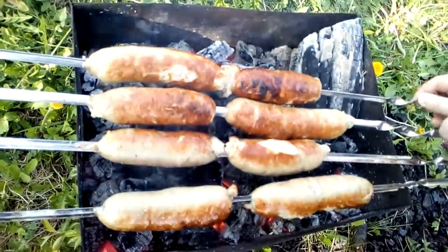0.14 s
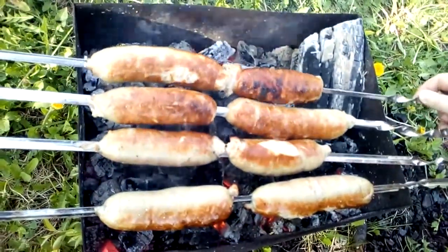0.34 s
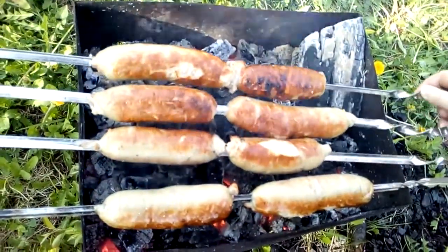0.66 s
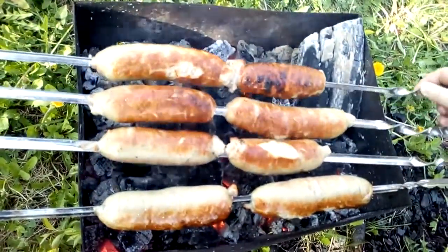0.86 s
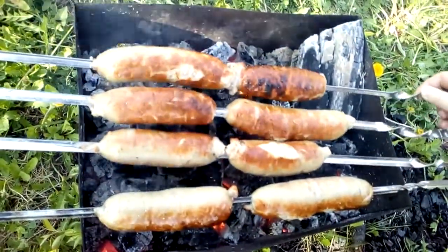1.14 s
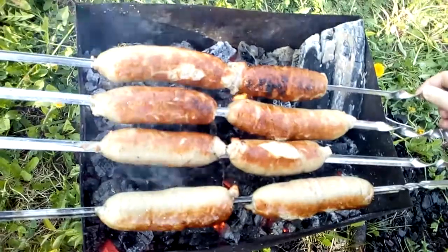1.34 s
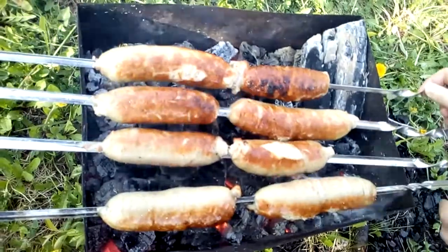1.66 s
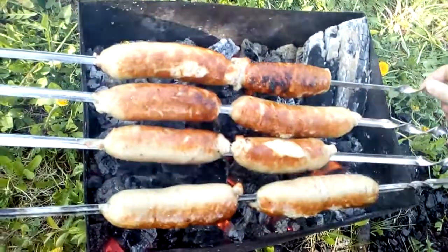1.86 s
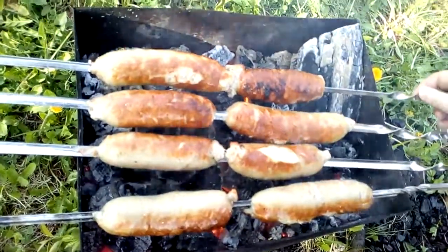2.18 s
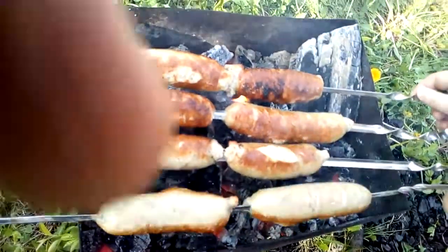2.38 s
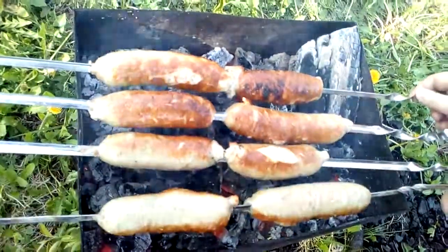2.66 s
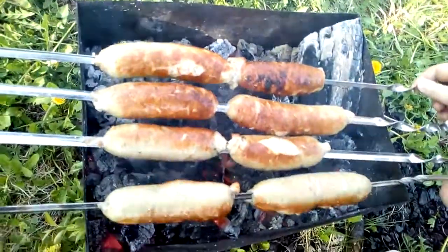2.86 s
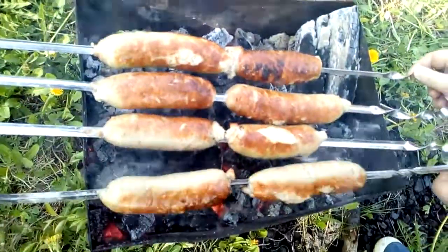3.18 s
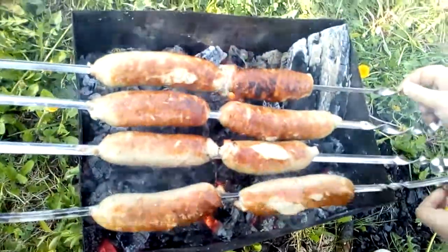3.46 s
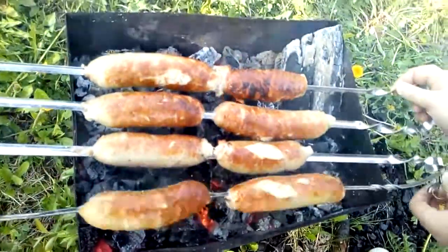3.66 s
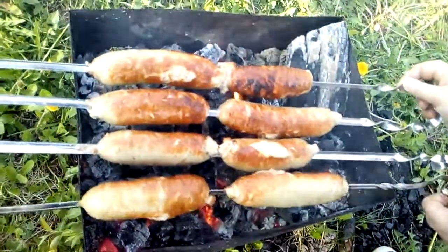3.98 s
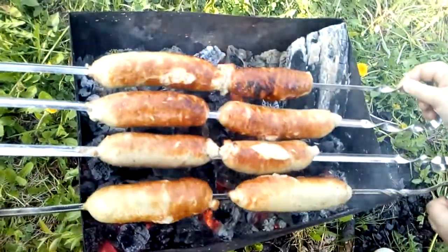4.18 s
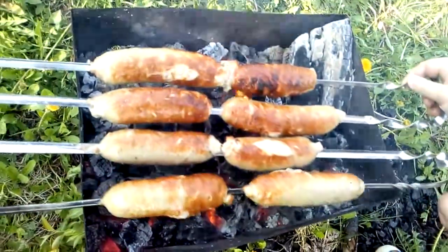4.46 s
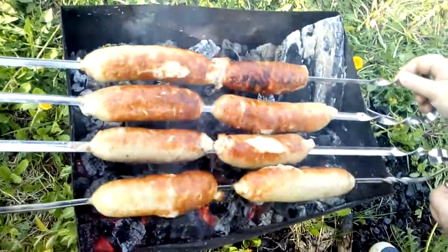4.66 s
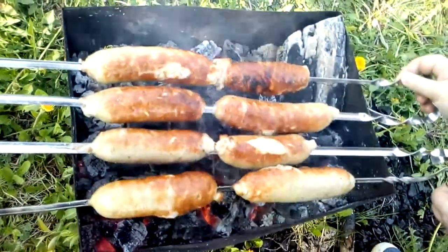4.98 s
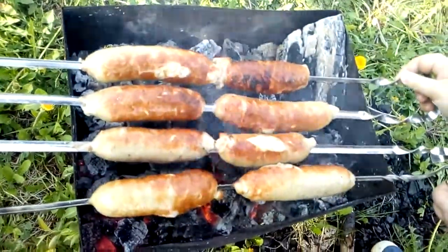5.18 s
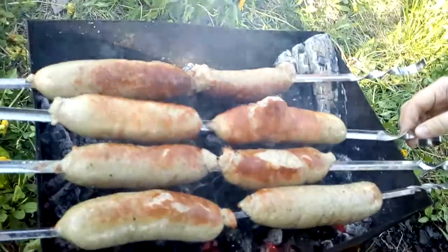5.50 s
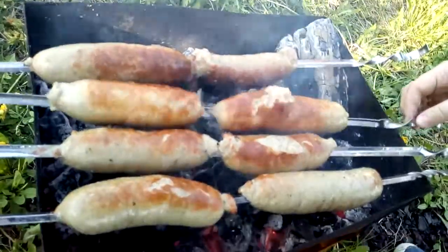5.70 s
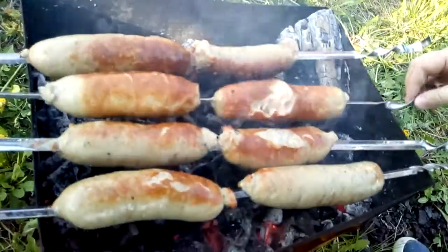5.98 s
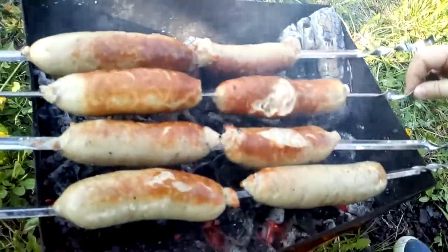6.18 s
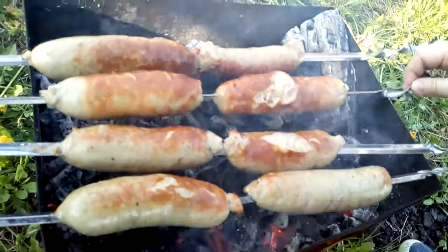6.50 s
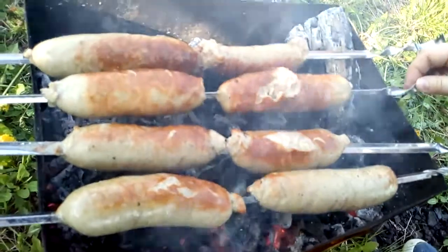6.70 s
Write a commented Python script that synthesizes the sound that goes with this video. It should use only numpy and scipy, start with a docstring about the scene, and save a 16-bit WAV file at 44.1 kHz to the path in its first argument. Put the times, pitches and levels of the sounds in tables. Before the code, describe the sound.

Close outdoor phone pickup of sausages sizzling over charcoal. A thin hiss and dense fine crackle run over tiny fat bubbles and faint low coal flutter. Sharp random pops with small airy thumps grow crowded after three seconds. Just before 5.3 seconds the sound cuts off abruptly, then sizzling fades back gradually, with pops still rising in level to the end.

```python
"""Steam pockets burst in the fat of sausages sizzling over a charcoal pan outdoors, close to a phone.
Each burst is shaped noise with a short ring and a slow push of air: crack, spatter and thump.
Fizz is many small bursts over a hiss, jets are banded noise that swells and dies away, the simmer is
a mass of decaying sine bubbles, and the coals are wavering half-octaves of noise.
The sound is cut once and then fades back in."""
import sys
import numpy as np
from scipy import signal
from scipy.fft import rfft, irfft
from scipy.io import wavfile
from scipy.ndimage import uniform_filter1d

SR = 44100
rng = np.random.default_rng(int(sys.argv[2]) if len(sys.argv) > 2 else 0)


def output_pcm(signal):
    """Save a mono or channel-first signal as 16-bit PCM at the path in sys.argv[1].

    Samples are clipped to [-1, 1] before scaling.
    """
    pcm = np.clip(np.atleast_2d(signal).T, -1, 1) * 32767
    wavfile.write(sys.argv[1], SR, np.round(pcm).astype(np.int16))


N = 301644  # length in samples

# Decay times of crack, spatter, ring and the leak ahead of the crack; median cycle of the thump
CRACK_S, SPATTER_S, RING_S, LEAK_S, THUMP_S = 0.00059, 0.0067, 0.0011, 0.005, 0.0014
LEAK_DB = -6.5  # leak beside the spatter
RING = 0.6  # ring beside the crack, before banding
SURGE, SURGE_SLOWER = 0.51, 2.89  # backwash of air: size and length beside the push
TREBLE_LEFT_HZ = 8500  # a band from here up leans 2 dB to the left; the lean grows with pitch squared
TICKS_A_SECOND, BUBBLES_A_SECOND = 100, 2000
SWELL_S, SETTLE_S = 0.013, 0.0091  # ramps of a boiling spell
COALS_DB, RIGHT_DB = -44.5, 2.5  # coal level before colouring; right channel above left
CUT_S, CUT_DB_PER_S, SILENCE_DB = 5.288, 2799, -66
RETURN_S, FADE_IN_S = 5.352, 2.2  # the fade is still rising at the end
TOP_HZ = 16700


def loud_bursts():
    """Large steam pockets burst one by one, each with its own balance of crack and thump."""
    # Each row: start in seconds, treble crack level in dB before band trims, middle crack in dB
    # relative to the treble level, thump in dB relative to the treble level.
    pops = [(0.0778, -22, -3, 0.5), (0.17, -10, -8.5, -4.5), (0.238, -26, 5.5, -3), (0.33, -19.5, -10, -3),
            (0.4372, -32, 5, -13), (0.47, -17, -26, -16), (0.4846, -30.5, -19, 13), (0.667, -18.5, -13, -3),
            (0.736, -17.5, -7.5, -6.5), (0.9311, -12.5, 0, -6.5), (1.178, -29, 2.5, -18),
            (1.375, -16.5, -4, 3.5), (1.385, -12, 4, -6.5), (1.448, -32.5, 11.5, 16.5),
            (1.461, -24, 3.5, 11.5), (1.413, -31, -4, -17), (1.4967, -28, 1.5, 5.5),
            (1.5827, -14, -8.5, -13.5), (1.7338, -20.5, -1, 0.5), (1.8376, -25.5, 2.5, 3.5),
            (1.909, -1, -11.5, -20.5), (1.9574, -14, -7, -7.5), (2.029, -16.5, -1.5, -21),
            (2.058, -19.5, -21, -27), (2.0777, -27, 5.5, -28), (2.145, -27.5, 2.5, 1),
            (2.2639, -5.5, -2, -18), (2.4125, -27.5, 5.5, 6.5), (2.555, -24.5, -2, -26),
            (2.5666, -29.5, 9.5, 6.5), (2.5864, -21, -22, -32), (2.6, -14.5, -7, -36),
            (2.665, -16.5, -3, -7.5), (2.7114, -27.5, 4.5, -14), (2.8708, -15, -2.5, -9),
            (2.9747, -16.5, -7.5, -5), (3.0109, -18.5, -9, -11), (3.0565, -21.5, -1.5, 2.5),
            (3.357, -7, -10.5, -16), (3.404, -16.5, -15, -32), (3.466, -35.5, 9, -5),
            (3.508, -19.5, -6.5, -35), (3.5641, -26.5, 1, 4), (3.6081, -7.5, -1, -16.5),
            (3.6857, -19, -2, -5.5), (3.837, -23.5, 2, 0), (3.904, -3, -5, -14.5), (3.936, -18.5, -3, 0),
            (4.0144, -11.5, 3, -4), (4.046, -17.5, -0.5, -22), (4.0778, -22, 1.5, 1.5),
            (4.0886, -15.5, -11, -14), (4.1433, -28, 13, 1), (4.187, -49, 22, 22), (4.2462, -11, -10, -15),
            (4.266, -19.5, -3, -13), (4.34, -33.5, 8, -16), (4.4235, -9, -7.5, -19), (4.466, -20.5, 1, -30),
            (4.495, -21.5, -5, -13), (4.56, -11.5, 6.5, -5.5), (4.734, -18, -13, -15),
            (4.736, -23, -12, -15), (4.7555, -12, -29, -39), (4.8, -10, -8, -13), (4.8244, -12, -12, -10),
            (4.8355, -17.5, -1.5, -6.5), (4.853, -21, 5.5, -8), (4.872, -18, -5, -9),
            (4.9278, -23.5, -7, -16), (4.9617, -12.5, -4.5, -10), (4.9778, -6, -5.5, -29),
            (5.0667, -14.5, -3.5, -5), (5.1029, -18, -7, 0.5), (5.1606, -1.5, -7.5, -11.5),
            (5.192, -21, 0, -3), (5.259, -4, -10.5, -16), (5.381, -34.5, 3, 8.5), (5.399, -25, -1, 0.5),
            (5.417, -32.5, 1, -5.5), (5.4877, -17, -7, -36), (5.51, -33, -1, -19), (5.658, -26.5, 1, -17),
            (5.773, -39, 10, -15), (5.805, -23.5, 2.5, -17), (5.924, -30.5, 14.5, 8),
            (5.9787, -33.5, 16, 10), (6.0631, -11, 7.5, -1), (6.3055, -7, -3.5, -9),
            (6.4504, -12, -5, -10.5), (6.6195, -21.5, -6, 3), (6.6612, -14.5, -4, -7.5)]
    s, treble_db, middle_db, thump_db = np.transpose(pops)
    spatter_db = -13.5 - 0.1 * treble_db  # strong bursts spatter less beside their crack
    return bursts(s, treble_db, middle_db, thump_db, spatter_db, 0.53, size=1300)


def bursts(s, treble_db, middle_db, thump_db, spatter_db, scatter_db, size):
    """Each pocket leaks steam, cracks open, shoves the air out and back, and throws uneven spatter."""
    t = (np.arange(size) - size // 4) / SR  # zero is the crack
    s = np.maximum(s + t[0], 0)
    after = np.maximum(t, 0)

    droplet_db = 2.95 * rng.standard_normal((len(s), size // 32 + 1))
    droplets = undb(np.repeat(droplet_db, 32, axis=1)[:, :size])
    leak = undb(LEAK_DB) * np.exp(t / LEAK_S)
    steam = np.where(t < 0, leak, np.exp(-(t / SPATTER_S) ** 2 / 2))
    crack = (t >= 0) * np.exp(-np.abs(t) / CRACK_S)
    shape = crack + undb(spatter_db)[:, None] * droplets * steam

    # random balance inside the treble pair and inside the middle pair of bands
    tilt_db = scatter_db * rng.standard_normal(len(s))
    lean_db = scatter_db * rng.standard_normal(len(s))
    upper_db = treble_db + middle_db
    # Each row: peak level in dB, band edges in Hz, left-right likeness.
    bands = ((treble_db + 3.5 + tilt_db, 10000, 18500, .3),
             (treble_db - 1.0 - tilt_db, 5200, 10000, .4),
             (upper_db - 7.0 + lean_db, 2500, 5200, .75),
             (upper_db - 10.0 - lean_db, 750, 2500, .85))
    cracks = 0
    for db, lo_hz, hi_hz, alike in bands:
        # the open pocket rings briefly at a pitch of its own
        ring_hz = lo_hz * (hi_hz / lo_hz) ** rng.random((len(s), 1))
        ring = RING * np.sin(2 * np.pi * ring_hz * after) * np.exp(-after / RING_S)
        grain = band(pair(shape.shape, alike) * shape + ring, lo_hz, hi_hz)
        grain = grain / np.abs(grain).max(axis=(0, 2), keepdims=True)
        left_right = np.array([[[1]], [[-1]]])
        grain = grain * undb(left_right * (lo_hz / TREBLE_LEFT_HZ) ** 2)
        cracks = cracks + place(s, grain * undb(db)[:, None])

    turns = after / THUMP_S * undb(1.8 * rng.standard_normal((len(s), 1)))
    push = (t >= 0) * np.sin(2 * np.pi * turns) * np.exp(-1.2 * turns)
    slow_turns = turns / SURGE_SLOWER
    push = push - SURGE * np.sin(2 * np.pi * slow_turns) * np.exp(-slow_turns)
    push = push * undb(treble_db + thump_db)[:, None]
    return cracks, place(s, np.array([push, push]))


def fizz(db):
    """Many small bursts, few of them large, come in flurries over a thin hiss."""
    count = int(TICKS_A_SECOND * N / SR)
    when, big, mid, low = rng.random((count, 4)).T
    s = when * (N - 1) / SR
    flurry_db = db + 1.2 * walk(11)
    # the logarithm makes large ticks rare
    tick_db = flurry_db[(s * SR).astype(int)] - 3.0 - 4.95 * np.log(1 - .88 * big)
    middle_db, thump_db = -12 + 21.5 * mid, -17 + 28.8 * low
    ticks, thumps = bursts(s, tick_db, middle_db, thump_db, np.full(count, -10.), 4.78, size=500)
    hiss_level = undb(-10.5) * np.sqrt(undb(db) * undb(flurry_db))  # follows flurries by half
    hiss = hiss_level * undb(3.5 * walk(35)) * pair((N,), .4)
    return ticks + hiss, thumps


def jets():
    """Steam jets: ragged high hiss that swells and fades alike on both sides of its peak."""
    # Each row: peak time in seconds, level in dB before banding and colouring,
    # swell and fade time constant in seconds.
    jet_peaks = [(4.755, -25, 0.0096), (4.807, -25, 0.01), (4.825, -19, 0.0044), (4.979, -15.5, 0.0019),
                 (5.259, -17, 0.003), (3.364, -28, 0.0071)]
    t = np.arange(N) / SR
    shape = sum(undb(db) * np.exp(-np.abs(t - s) / swell) for s, db, swell in jet_peaks)
    return band(pair((N,), 0.35) * shape * undb(1.8 * walk(680)), 4300, 17000)


def simmer(db):
    """Dense small bubbles in the fat, each ringing for a cycle or two at a pitch set by its size."""
    when, pitch, big, pan = rng.random((int(BUBBLES_A_SECOND * N / SR), 4)).T
    s = when * (N - 1) / SR
    hz = 650 * 2 ** (1.6 * pitch ** 1.5)
    turns = hz[:, None] * np.arange(300) / SR
    wavering_db = db + 2.17 * walk(22)
    # high bubbles are quieter
    size_db = wavering_db[(s * SR).astype(int)] + 3.5 + 5.45 * big - 6.0 * pitch
    bubble = np.sin(2 * np.pi * turns) * np.exp(-.85 * turns) * undb(size_db)[:, None]
    pan_db = 10.0 * (pan - .5)[:, None]
    return place(s, np.array([bubble * undb(pan_db), bubble * undb(-pan_db)]))


def boiling():
    """The fat boils up in spells: dB above the simmer, ramped up and down; the shortest stay below full."""
    # Each row: start in seconds, length in seconds, full lift above the simmer in dB.
    spells = [(0.0, 0.27, 11.5), (0.317, 0.073, 11), (0.457, 0.27, 8), (0.914, 0.16, 10),
              (3.143, 0.012, 9.5), (3.2, 0.01, 10), (3.515, 0.066, 13.5), (3.681, 0.028, 21),
              (4.19, 0.027, 15.5), (4.405, 0.031, 10), (5.562, 0.17, 9), (6.347, 0.136, 6.5)]
    t = np.arange(N) / SR
    lift_db = 0
    for s, length, db in spells:
        rise = (t - s) / SWELL_S
        fall = (s + length - t) / SETTLE_S + 1
        lift_db = lift_db + db * np.clip(np.minimum(rise, fall), 0, 1)
    return lift_db


def coals(db):
    """Hot air flutters over the coals: half-octaves that swell together and waver alone."""
    # Each row: frequency in Hz, relative gain in dB of the rumble.
    rumble_colour = [(12, -29), (20, 3.5), (80, 2.5), (280, -2), (450, -7.5), (1200, -38.5)]
    swell, out = walk(9.9), 0
    for hz in 24 * 2 ** np.arange(0, 5.7, .5):
        flutter_db = db + 1.8 * swell + 1.96 * walk(20)
        # the lowest rumble and the upper rustle reach the two microphones less alike
        alike = np.interp(hz, (30, 60, 600), (.6, .97, .8))
        out = out + undb(flutter_db) * band(pair((N,), alike), hz / 1.124, hz * 1.267)
    return undb(19.5) * colour(out, rumble_colour)


def bed_levels():
    """Fizz and simmer levels in dB, drawn between breakpoints for every sample."""
    # Each row: time in seconds, fizz level in dB, simmer level in dB, both before grain trims.
    bed = [(0.0, -43.5, -52.5), (1.3, -43, -51), (1.75, -43.5, -54), (1.95, -40, -48.5), (2.5, -42, -58),
           (3.35, -45.5, -55), (3.8, -43, -58), (4.05, -38, -58), (4.35, -42, -56), (4.75, -36, -45),
           (4.9, -40.5, -44), (5.28, -39, -46), (5.38, -41, -55.5), (6.84, -38.5, -48.5)]
    s, *columns = np.transpose(bed)
    return [np.interp(np.arange(N) / SR, s, c) for c in columns]


def pan_colour(x):
    """Pan and microphone colour the bursts and jets."""
    # Each row: frequency in Hz, relative gain in dB.
    treble = [(700, 3.5), (1200, 1), (2700, 2.5), (4600, -3.5), (6800, -1), (8200, -6), (9300, -2.5),
              (11500, -4.5), (15500, -0.5), (16100, -35.5)]
    return undb(3.5) * colour(x, treble)


def undb(db):
    """Decibels to amplitude."""
    return 10 ** (np.asarray(db) / 20)


def colour(x, points):
    """Causal filter through (Hz, dB) points, from the folded cepstrum of the log gain."""
    hz, db = np.transpose(points)
    grid = np.maximum(np.fft.rfftfreq(8192, 1 / SR), 1)
    log_gain = np.interp(np.log(grid), np.log(hz), db) * np.log(10) / 20
    cep = irfft(log_gain)
    cep[1:4096] *= 2
    cep[4097:] = 0
    impulse = irfft(np.exp(rfft(cep)))[None, :4096]
    return signal.oaconvolve(x, impulse, axes=1)[:, :N]


def band(x, lo_hz, hi_hz):
    """Band-pass between two frequencies."""
    return signal.sosfilt(signal.butter(2, [lo_hz, hi_hz], "bandpass", fs=SR, output="sos"), x)


def pair(shape, alike):
    """Left and right noise with the given likeness, mixed from mid and side."""
    mid, side = rng.standard_normal((2,) + shape)
    alike = np.clip(alike, 0, 1)
    return np.sqrt((1 + alike) / 2) * mid + np.sqrt((1 - alike) / 2) * np.array([side, -side])


def walk(rate):
    """Random levels held for 1 / rate seconds and smoothed twice; spread near 1."""
    k = int(SR / rate)
    steps = np.repeat(rng.standard_normal(N // k + 1), k)
    return 1.3 * uniform_filter1d(uniform_filter1d(steps, k), k)[:N]


def place(s, grains):
    """Lay grains (channels, events, samples) at their times and sum them."""
    at = (np.round(s * SR).astype(int)[:, None] + np.arange(grains.shape[2])).ravel()
    return np.array([np.bincount(at, g.ravel(), N + SR)[:N] for g in grains])


def scene():
    """Loud bursts over fizz, jets, simmer and coals, a little nearer the right microphone."""
    fizz_db, simmer_db = bed_levels()
    cracks, thumps = loud_bursts()
    small_cracks, small_thumps = fizz(fizz_db)
    mix = pan_colour(cracks + small_cracks + jets()) + thumps + small_thumps
    mix = mix + simmer(simmer_db + boiling()) + coals(COALS_DB)
    return mix * undb([[-RIGHT_DB / 2], [RIGHT_DB / 2]])


def record(dry):
    """Deepest bass drops away; the sound is cut and fades in linearly; peaks clip, the top is cut."""
    heard = signal.sosfilt(signal.butter(1, 15, "highpass", fs=SR, output="sos"), dry)
    t = np.arange(N) / SR
    cut = undb(np.clip(-CUT_DB_PER_S * (t - CUT_S), SILENCE_DB, 0))
    fade_in = np.clip((t - RETURN_S) / FADE_IN_S, 0, 1)
    clipped = np.clip(heard * np.maximum(cut, fade_in), -.85, .85)
    top = signal.ellip(12, .2, 110, TOP_HZ, fs=SR, output="sos")
    return signal.sosfilt(top, clipped)


dry = scene()
out = record(dry)
output_pcm(out)
```